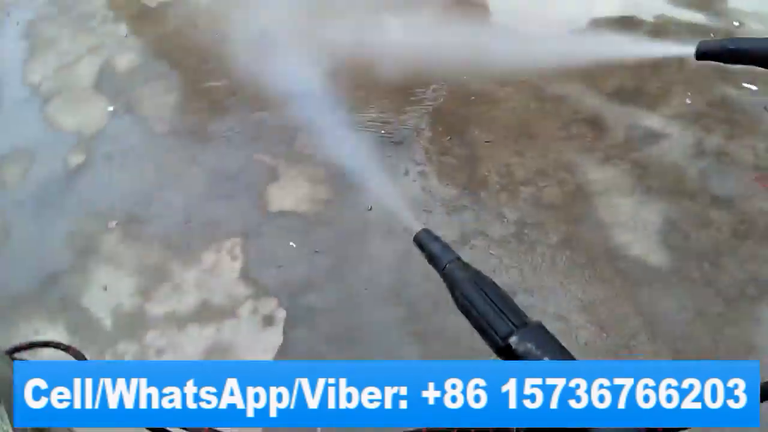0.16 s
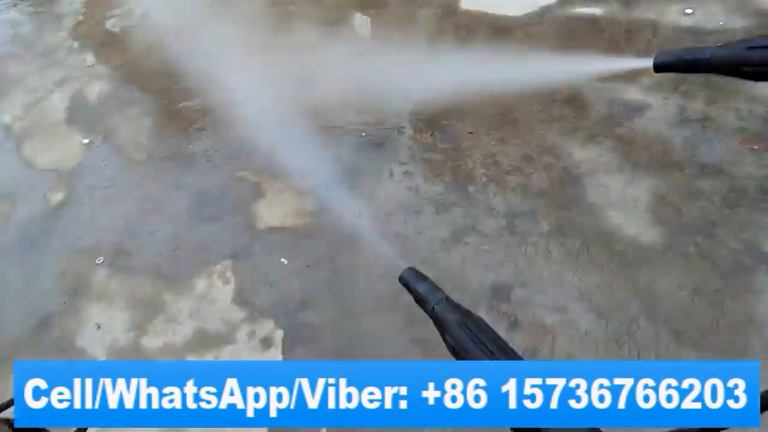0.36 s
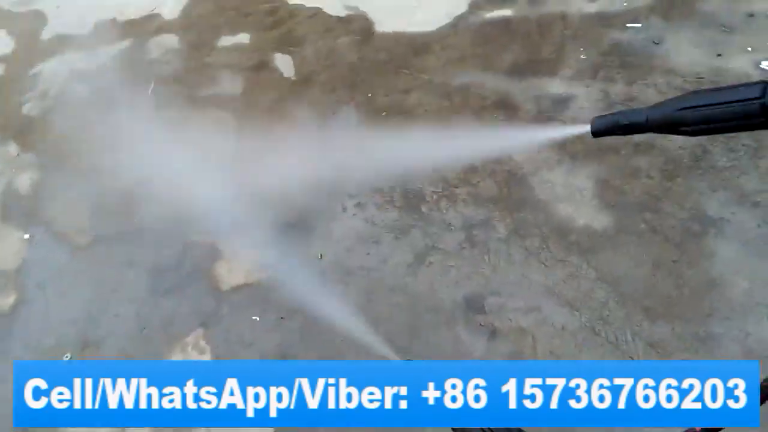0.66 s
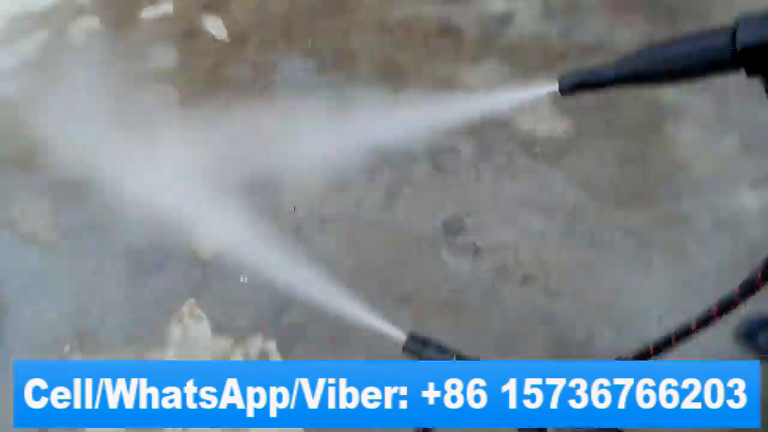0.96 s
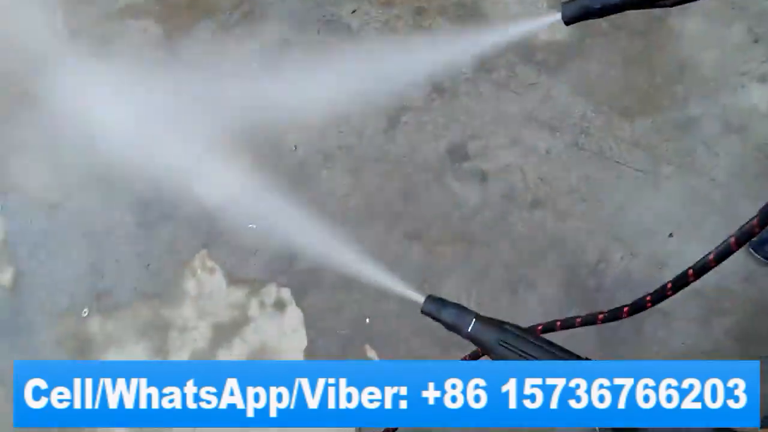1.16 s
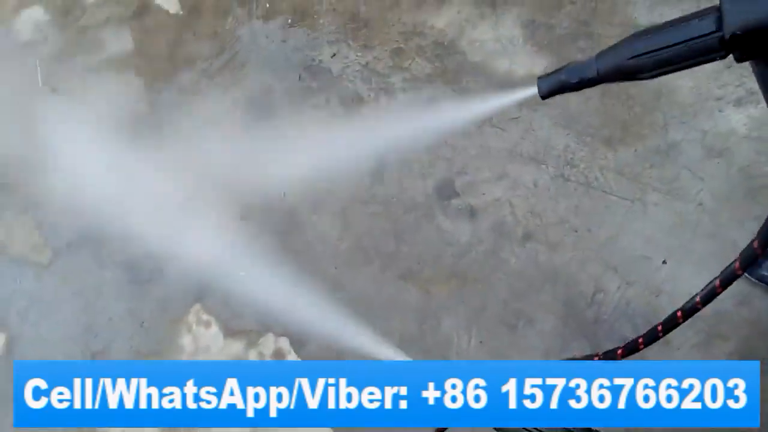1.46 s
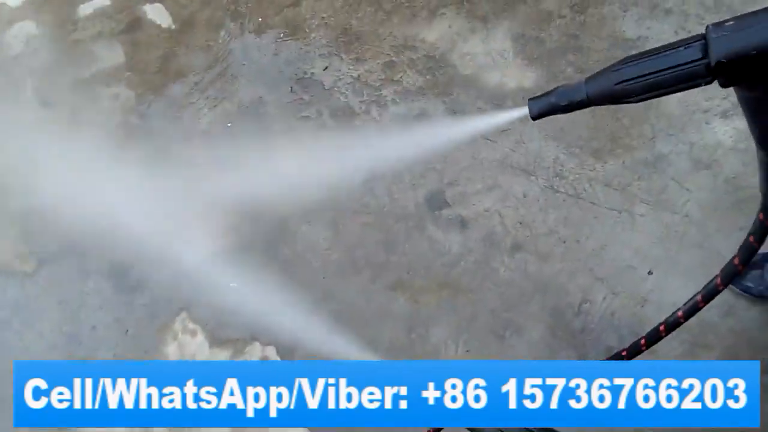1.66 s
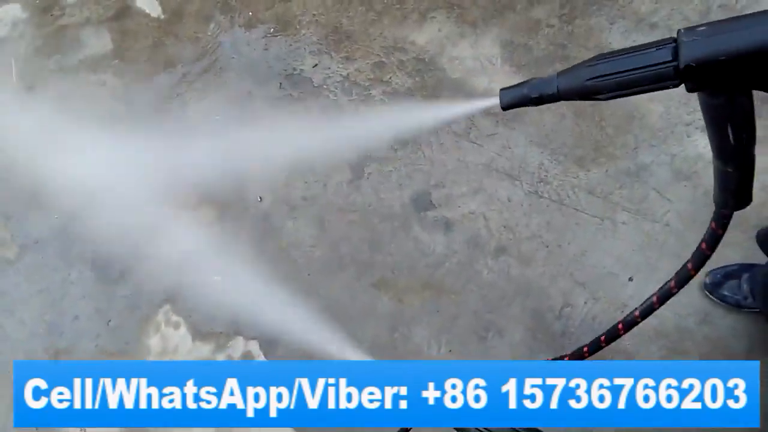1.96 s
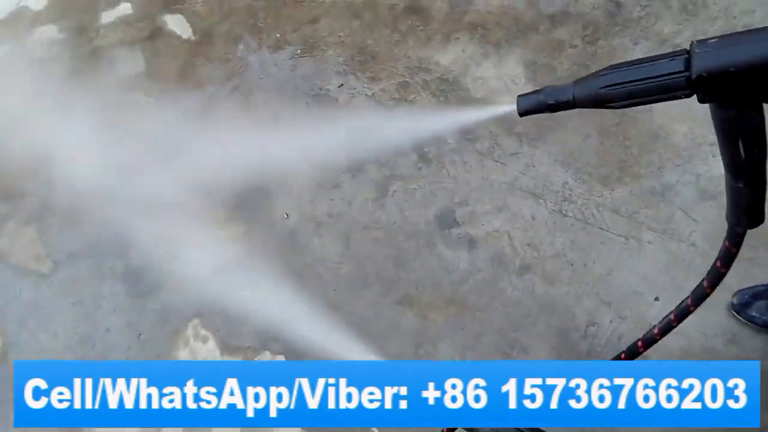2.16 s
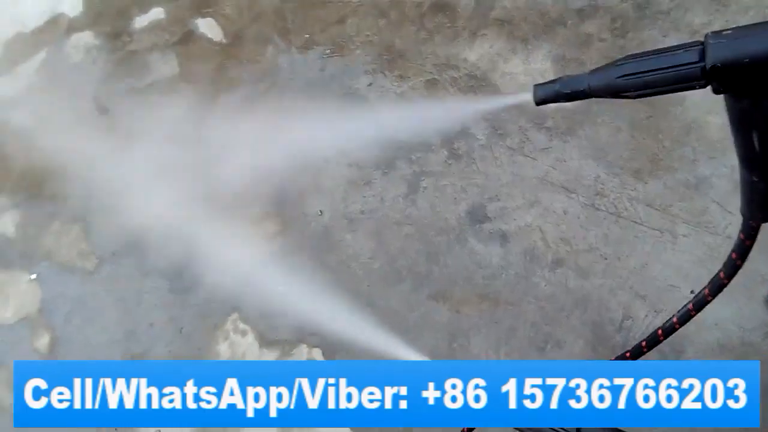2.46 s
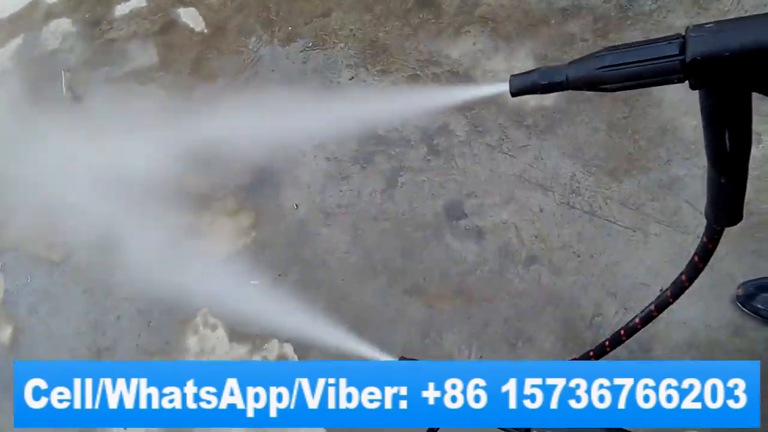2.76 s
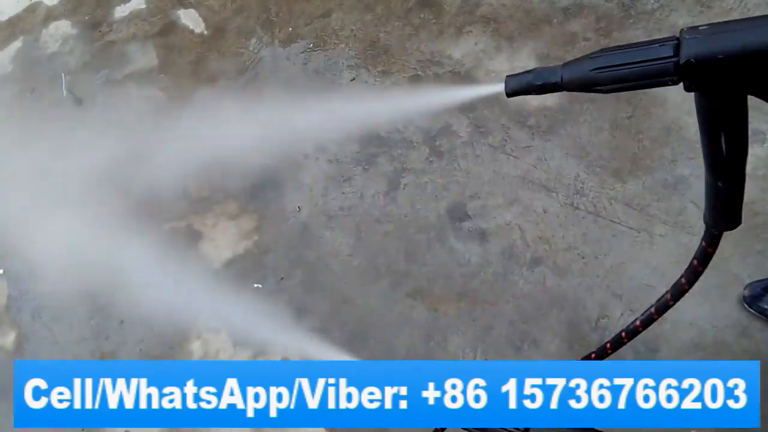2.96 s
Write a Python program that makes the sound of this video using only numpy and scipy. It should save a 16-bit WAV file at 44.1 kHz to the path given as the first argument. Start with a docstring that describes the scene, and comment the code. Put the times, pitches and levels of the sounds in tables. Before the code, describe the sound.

Two handheld steam guns blast a continuous, bright, close hiss over wet concrete, with irregular water spits throughout; a faint mains hum is strongest at first and recedes as the microphone moves.

```python
"""From the start two hand-held steam guns hiss over a wet concrete floor, and water slugs spit through the jets
throughout. Each jet is shaped noise over a low rumble that swells with it, likely microphone overload; five
shifting reflections sweep comb-like bands through jets and spits. The machine's hum, a sum of mains harmonics,
is strongest at first and recedes unevenly as the microphone moves off. A damped sine bumps the microphone at
about 1.4 s; the top fizz peaks near 2.8 s. The roar, strong early and weak near 2.2 s, has returned by the end."""
import sys
import numpy as np
from scipy import signal
from scipy.io import wavfile
from scipy.ndimage import uniform_filter1d, map_coordinates

SR = 44100
rng = np.random.default_rng(int(sys.argv[2]) if len(sys.argv) > 2 else 0)


def dump(signal):
    """Clip the signal to [-1, 1] and save it as 16-bit WAV at the path in sys.argv[1]."""
    limited = np.clip(np.atleast_2d(signal).T, -1, 1)
    pcm = np.round(limited * 32767).astype(np.int16)
    wavfile.write(sys.argv[1], SR, pcm)


def boost(x):
    """Linear amplitude factor 10**(x/20) for a level x in decibels (scalar or array-like)."""
    u = np.asarray(x, float) / 20
    return 10 ** u


N = 136710

# All levels in the tables are relative; the sources add their own offsets.
# Harmonics of the machine's hum: harmonic_number, level_db
HUM_HARMONICS = [(2, -19), (3, 2), (4, 1.5), (5, -3), (6, -0.5), (7, -7.5), (8, -9)]
# Hum level as the microphone moves off: time_s, level_db
HUM_LEVEL = [(0.0, -52), (0.1, -58), (0.14, -61.5), (0.53, -63), (1.24, -62), (1.78, -63), (2.17, -78),
             (2.28, -58), (3.1, -86)]
# Dull bumps on the microphone: start_s, level_db
BUMPS = [(1.364, -34)]
# Spectrum of low rumble and mid noise, likely microphone overload: frequency_hz, gain_db
OVERLOAD_SPECTRUM = [(15, -26), (25, 1.5), (196, -2.5), (448, -5), (582, -4.5), (639, -4), (912, -3),
                     (1210, -5), (2200, 0.5), (2860, -26), (4840, -120)]
# Slugs of water: start_s, spit_db, splat_db (over the spit), surge_db (of the hiss)
SLUGS = [(0.0437, -14, -22.5, -19), (0.2433, -15, -27, -19), (0.272, -20.5, -31, -23),
         (0.3374, -16.5, -30, -18), (0.4074, -16, -23, -15.5), (0.4696, -23, -18, -52),
         (0.5286, -11, -53, -14), (0.603, -8.5, -30, -13.5), (0.635, -11, -29, -16),
         (0.6594, -16, -32, -21), (0.6918, -12.5, -23.5, -23), (0.727, -20, -22, -18),
         (0.832, -14, -25.5, -16), (0.8692, -19.5, -17.5, -15.5), (1.094, -15, -20.5, -26),
         (1.134, -18, -30, -13), (1.3844, -25, -8.5, -15), (1.4182, -16, -28, -19), (1.5903, -15, -26, -18),
         (1.8076, -18, -26, -15.5), (2.0384, -20, -21, -15), (2.1494, -33, -33, -22), (2.31, -39, 0, -21),
         (2.3845, -17.5, -18.5, -15), (2.803, -16.5, -19, -10.5), (2.835, -16, -21, -23),
         (2.9223, -22, -17, -33), (2.9564, -29, -11, -12), (3.0403, -17, -22, -18),
         (3.054, -12.5, -20, -15)]
# Spectrum of slugs splatting on the floor: frequency_hz, gain_db
SPLAT_SPECTRUM = [(40, -120), (80, 2), (400, 6), (1800, 8.5), (2500, -41), (3500, -120)]
# Spectrum of slugs spitting through a nozzle: frequency_hz, gain_db
SPIT_SPECTRUM = [(1300, -120), (1900, -9.5), (2800, -0.5), (3800, 8.5), (5000, -2.5), (6000, -22),
                 (7500, -120)]
# Jets as the nozzles turn toward the microphone: time_s, hiss_db, fizz_db
JET_LEVELS = [(0.0, -19.5, -31), (0.33, -19.5, -31.5), (0.71, -18.5, -38), (0.98, -18, -42),
              (1.3, -16.5, -33), (1.63, -18, -35), (2.12, -18.5, -36.5), (2.55, -18, -32), (2.77, -16, -27),
              (2.92, -17.5, -31), (3.1, -16, -34)]
# Lower jet roar, stronger while the nozzles are near: time_s, level_db
ROAR_LEVEL = [(0.0, -31.5), (0.59, -30.5), (0.85, -33.5), (2.16, -52), (3.1, -35)]
# Spectrum of the main hiss: frequency_hz, gain_db
HISS_SPECTRUM = [(1410, -82), (2400, -25), (3100, -25), (3840, -18.5), (4690, -12), (5500, -8), (6310, -3),
                 (7550, 0.5), (9880, -5.5), (12500, -23), (16200, -60), (22000, -120)]
# Spectrum of the lower roar: frequency_hz, gain_db
ROAR_SPECTRUM = [(1500, -120), (2000, -17), (2800, 4.5), (4000, 2.5), (5500, 15), (7000, -120)]
# Spectrum of the top fizz: frequency_hz, gain_db
FIZZ_SPECTRUM = [(8500, -120), (9500, -27), (11000, 2), (12500, -2), (14200, -9.5), (15000, -120)]
# Reflections off floor and nearby surfaces, shifting as guns and microphone move:
# time_s, then delay_ms of each of five extra paths
REFLECTION_DELAYS = [(0, .345, .524, .695, .7, .24), (.36, .388, .524, .7, .72, .24),
                     (.55, .425, .675, 1.05, .79, .24), (.8, .482, .695, 1.08, .765, .3),
                     (1.27, .536, .709, 1.12, .8, .272), (1.57, .57, .6, 1.1, .865, .213),
                     (2.02, .592, .478, 1.07, .832, .22), (2.2, .602, .48, .955, .82, .25),
                     (2.47, .618, .49, .933, .813, .3), (2.75, .69, .5, .914, .81, .3),
                     (3.1, .712, .59, .89, .81, .3)]
# Strength of the same reflections: time_s, then strength (0-1) of each
REFLECTION_STRENGTHS = [(0, 0.27, 0.32, 0.17, .03, 0.017), (.35, 0.25, 0.15, 0.12, .05, 0.022),
                        (.6, 0.43, 0.23, 0.026, 0.15, 0.06), (.95, 0.29, 0.03, 0.11, 0.1, 0.073),
                        (1.27, 0.3, 0.1, .12, .03, 0.12), (1.6, 0.24, 0.023, 0.037, 0.17, 0.094),
                        (2, 0.19, 0.087, .12, 0.13, 0.042), (2.4, 0.21, 0.054, 0.2, 0.13, 0.028),
                        (2.8, 0.19, 0.073, 0.3, 0.06, 0.022), (3.1, 0.18, 0.16, 0.31, .03, .03)]
# Approximate share of treble patches replaced by unrelated noise left and right: frequency_hz, share (0-1)
NOISE_SHARE = [(4200, 0), (4600, .06), (6000, .22), (8000, .4), (10000, .38), (12500, .45), (14000, 0.06)]


def unit(x):
    """Normalization: scales a signal to an rms of 1."""
    return x / np.sqrt(np.mean(x ** 2) + 1e-20)


def along(points, hz):
    """Interpolation of a spectrum along a logarithmic frequency axis."""
    point_hz, value = np.transpose(points)
    return np.interp(np.log(hz + 1), np.log(point_hz + 1), value)


def curves(rows):
    """Linear interpolation in time: one value per sample for each column after the time."""
    time_s, *columns = np.transpose(rows)
    return [np.interp(np.arange(N) / SR, time_s, column) for column in columns]


def wobble(rate):
    """Slow random modulation: a smooth curve through random knots, rate of them a second."""
    knots = rng.standard_normal(int(N * rate / SR) + 4)
    return map_coordinates(knots, [np.arange(N) * rate / SR])


def smooth(field, bands, frames):
    """Local averaging over neighbouring frequency bands and time frames."""
    return uniform_filter1d(uniform_filter1d(field, size=bands, axis=0), size=frames, axis=1)


def rush(spectrum, patchy_db):
    """Turbulence noise: filtered white noise of rms 1, its gain varying in random patches."""
    hz, _, z = signal.stft(rng.standard_normal(N + 512), SR, nperseg=512)
    patches = unit(smooth(rng.standard_normal(z.shape), bands=8, frames=4))
    gain = boost(along(spectrum, hz)[:, None] + patchy_db * patches)
    return unit(signal.istft(z * gain, SR, nperseg=512)[1][:N])


def spurts(levels_db, fall_s):
    """Transient envelope: a quick rise and an exponential fall for every slug of water."""
    rise_s = .005
    kicks = np.zeros(N)
    kicks[(np.transpose(SLUGS)[0] * SR).astype(int)] = boost(levels_db)
    t = np.arange(SR // 10) / SR
    shape = (1 - np.exp(-t / rise_s)) * np.exp(-t / fall_s)
    return np.abs(signal.fftconvolve(kicks, shape / shape.max())[:N])


def machine():
    """Harmonic series: multiples of the mains frequency, each wavering a little in level."""
    mains_hz = 50.1
    t = np.arange(N) / SR
    tones = np.zeros(N)
    for harmonic, level_db in HUM_HARMONICS:
        cycles = harmonic * mains_hz * t + rng.random()
        tones += boost(level_db + 2.4 * wobble(7.9)) * np.sin(2 * np.pi * cycles)
    return boost(curves(HUM_LEVEL)[0]) * tones


def thump():
    """Damped oscillation: a low sine under a linear rise times an exponential decay."""
    pitch_hz, decay_60db_s = 85, .05
    (start_s, level_db), = BUMPS
    t = np.clip(np.arange(N) / SR - start_s, 0, None)
    envelope = boost(level_db - 60 * t / decay_60db_s) * (t / .006)
    return envelope * np.sin(2 * np.pi * pitch_hz * t)


def overload_noise(flow, flutter_db):
    """Envelope following: low rumble and mid noise swell as a fractional power of the jet flow."""
    level = boost(-47.5 + 1.4 * wobble(25.05))
    swing = (unit(flow) * boost(flutter_db)) ** 0.61
    return level * swing * rush(OVERLOAD_SPECTRUM, patchy_db=0.5)


def floor_splats():
    """Impact noise: a brief low noise burst as each slug splats on the floor."""
    _, spit_db, splat_db, _ = np.transpose(SLUGS)
    return spurts(spit_db + splat_db - 6, fall_s=.004) * rush(SPLAT_SPECTRUM, patchy_db=3.0)


def water_spits():
    """Transient flow noise: a brief noise burst as each slug spits through a nozzle."""
    spit_db = np.transpose(SLUGS)[1]
    return spurts(spit_db - 12, fall_s=.004) * rush(SPIT_SPECTRUM, patchy_db=-0.6)


def jet_flow(hiss_db):
    """Power addition: the steady flow and the surges of the slugs add as squares."""
    surge_db = np.transpose(SLUGS)[3]
    return np.hypot(boost(hiss_db - 1.59), spurts(surge_db - 4.0, fall_s=.012))


def steam_jet(flow, fizz_ratio, roar, flutter_db):
    """Jet turbulence: hiss, lower roar and top fizz flutter together in one plume."""
    plume = flow * rush(HISS_SPECTRUM, patchy_db=1.74)
    plume = plume + roar * rush(ROAR_SPECTRUM, patchy_db=4.0)
    plume = plume + flow * fizz_ratio * rush(FIZZ_SPECTRUM, patchy_db=2.0)
    return boost(flutter_db + 0.82 * wobble(22.15)) * plume


def off_surfaces(x):
    """Comb filtering: each surface in turn adds a later copy of all that reaches it."""
    strengths = np.clip(curves(REFLECTION_STRENGTHS), 0, .7)
    for delay_ms, strength in zip(curves(REFLECTION_DELAYS), strengths):
        echo = map_coordinates(x, [np.arange(N) - delay_ms * SR / 1000], order=5)
        x = (x + strength * echo) / np.sqrt(1 + strength ** 2)
    return x


def guns():
    """Superposition: two separate jets and the spits are reflected; overload noise and splats are not."""
    hiss_db, fizz_db = curves(JET_LEVELS)
    flow = jet_flow(hiss_db)
    fizz_ratio = boost(fizz_db - hiss_db - 3.0)
    roar = boost(curves(ROAR_LEVEL)[0] - 3 + 0.85 * wobble(18))
    flutter_db = 0.14 * wobble(15) + 0.88 * wobble(40)  # shared by both jets and the overload noise
    jets = water_spits()
    for _ in range(2):
        jets = jets + steam_jet(flow, fizz_ratio, roar, flutter_db)
    return off_surfaces(jets) + overload_noise(flow, flutter_db) + floor_splats()


def scene():
    """Superposition of all sources, identical in the left and right channels."""
    return np.tile(machine() + thump() + guns(), (2, 1))


def soft_peaks(x):
    """Saturation: peaks round off smoothly toward a ceiling."""
    ceiling, knee = .62, 5
    return x / (1 + np.abs(x / ceiling) ** knee) ** (1 / knee)


def noise_patches(mono):
    """Noise substitution: in treble patches unrelated noise of similar level replaces left and right."""
    hz, _, z = signal.stft(mono, SR, nperseg=1024)
    others = signal.stft(rng.standard_normal((2, N)), SR, nperseg=1024)[2]
    level = np.sqrt(np.abs(smooth(np.abs(z) ** 2, bands=12, frames=2)))
    # Ranking smoothed random cells, 16 bins by 2 frames each, brings the noisy patches near the listed shares
    cells = smooth(rng.random((z.shape[0] // 16 + 1, z.shape[1] // 2 + 1)), bands=3, frames=2)
    cell_rank = cells.ravel().argsort().argsort().reshape(cells.shape) / cells.size
    rank = np.kron(cell_rank, np.ones((16, 2)))[:z.shape[0], :z.shape[1]]
    noisy = rank < along(NOISE_SHARE, hz)[:, None]
    unrelated = boost(.4) * level * others / np.sqrt(np.mean(np.abs(others) ** 2))
    return signal.istft(np.where(noisy, unrelated, z), SR, nperseg=1024)[1][:, :N]


def roll_off(x):
    """The treble ends steeply here."""
    return signal.sosfilt(signal.butter(12, 14270, fs=SR, output="sos"), x)


def record(dry):
    """Signal chain: one channel with rounded peaks gains unrelated noise patches left and right."""
    mono = soft_peaks(dry[0])
    mix = noise_patches(mono)
    return roll_off(mix)


dry = scene()
out = record(dry)
dump(out)
```